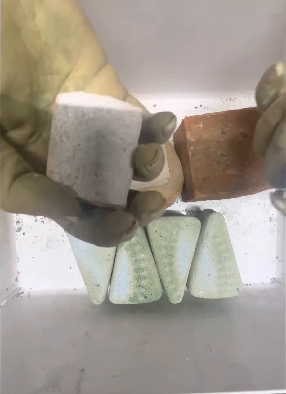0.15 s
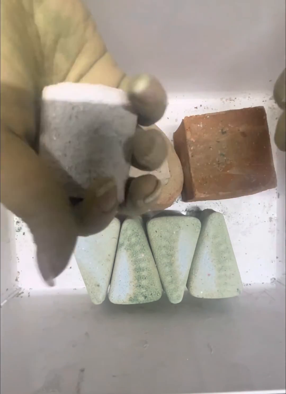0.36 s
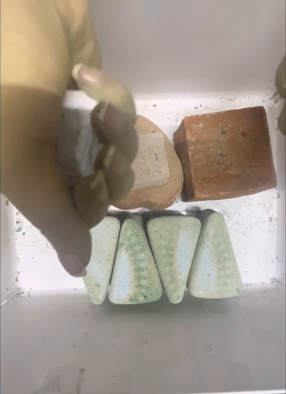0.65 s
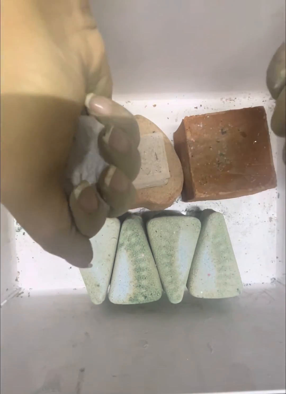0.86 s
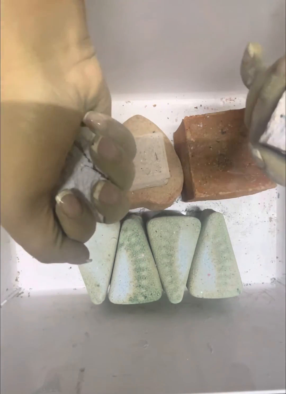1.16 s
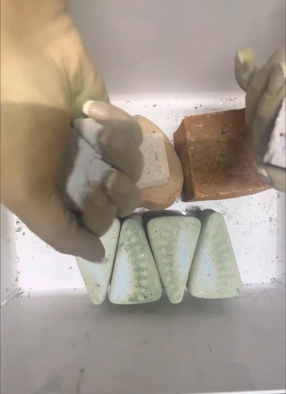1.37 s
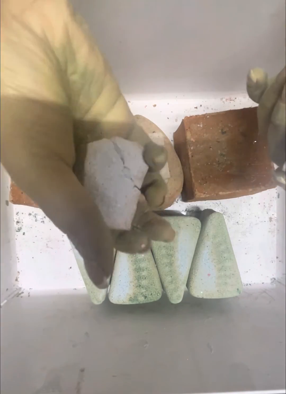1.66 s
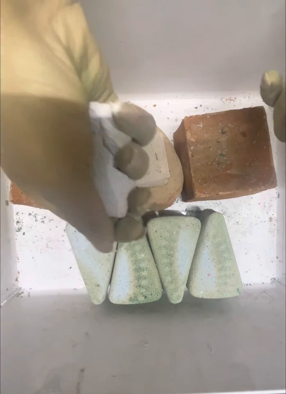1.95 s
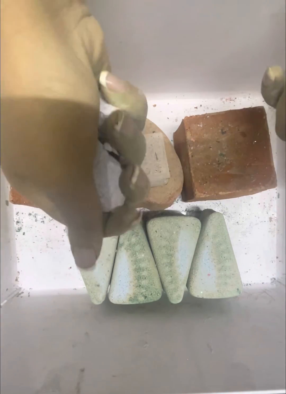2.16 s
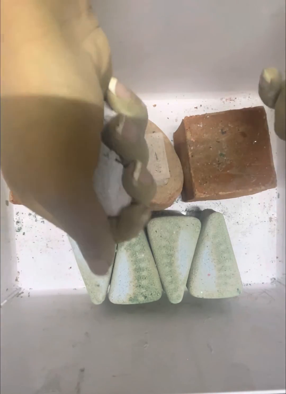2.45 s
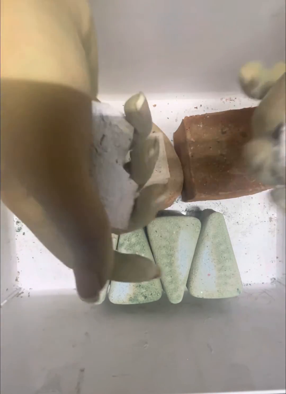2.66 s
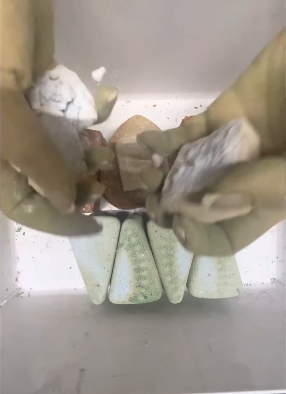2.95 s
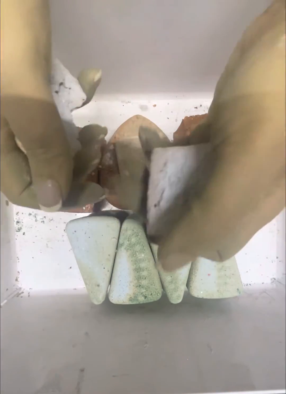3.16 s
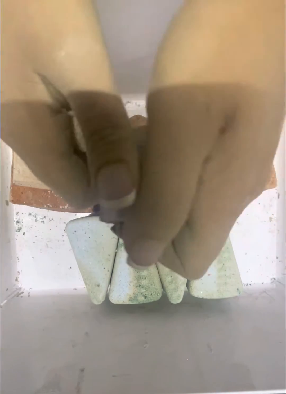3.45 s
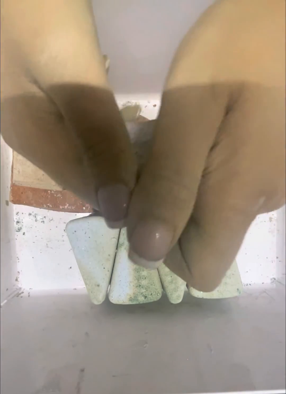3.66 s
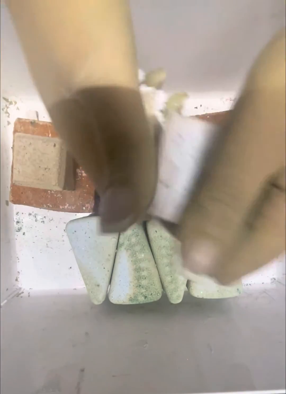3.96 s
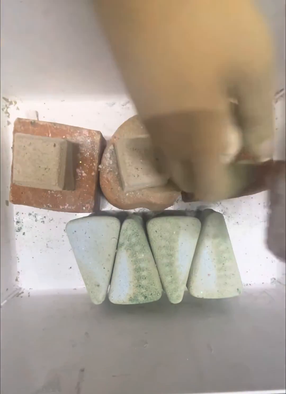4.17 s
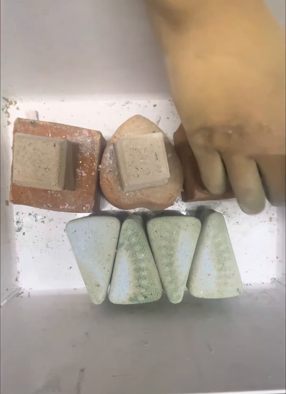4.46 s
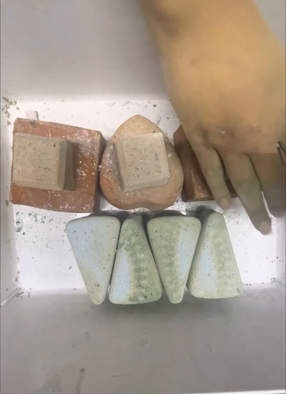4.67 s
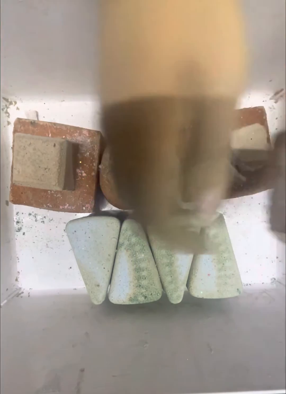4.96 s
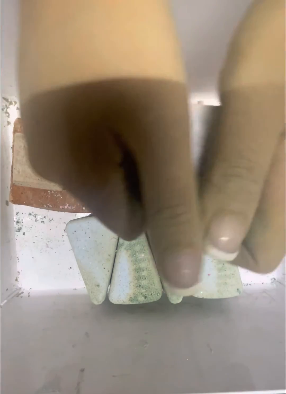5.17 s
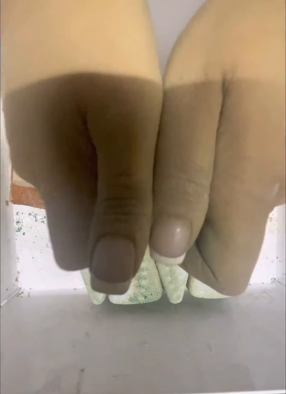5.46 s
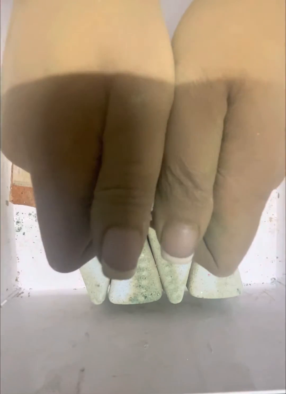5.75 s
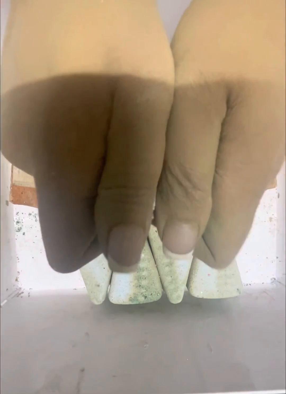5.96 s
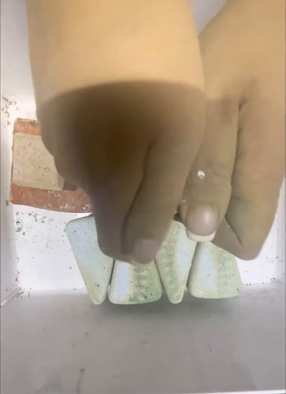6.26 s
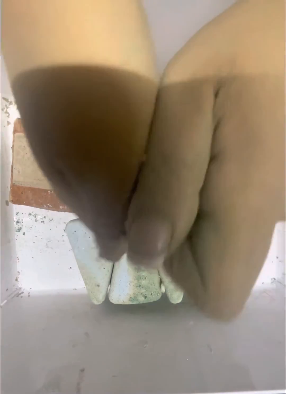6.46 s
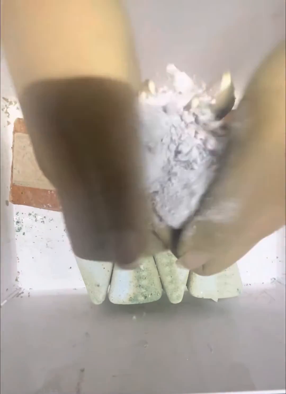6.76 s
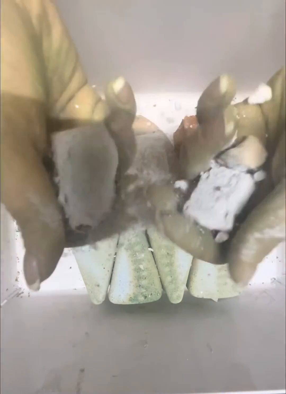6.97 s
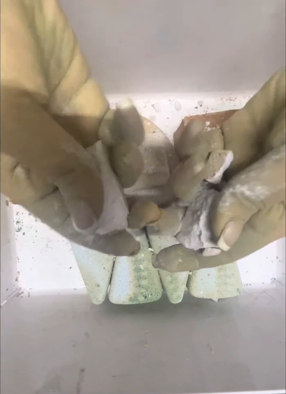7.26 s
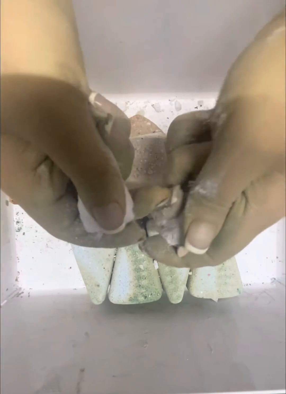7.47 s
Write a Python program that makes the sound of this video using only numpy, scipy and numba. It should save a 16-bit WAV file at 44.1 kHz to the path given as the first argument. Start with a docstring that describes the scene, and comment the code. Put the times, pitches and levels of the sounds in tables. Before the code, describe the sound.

Chalk is crushed by hand over a plastic tub, very close, in a quiet room with a short faint tail and soft low motor hum. From 0 s small dry crackles build to a sharp snap at 0.6 and another at 0.97, each with a soft bump. A near-quiet gap follows, then light ticks, and a busier crackle around 2.0-2.3 with fine grit. Faint rubbing and tiny squeaks lead to a loud crack at 3.0, chunks knocking the tub and crumbs pattering. Irregular snaps, scrapes and hollow knocks continue from 3.6 to 4.9, some shards clinking. It calms to faint dusty crackle as the low drone swells, until the loudest crack at 5.82 with a thump. From 6.0 to 7.2 grinding and dense brittle crunching, strong snaps at 6.5 and 6.84, clinks and tub knocks; then sparse grit and a last snap at 7.6.

```python
"""Chalk cracks as hands squeeze blocks of it over a plastic tub in a quiet room, close to a phone's two ports.
Each crack is a run of tiny fractures, made from bursts of noise that ring the chalk and thump the tub.
Pieces strike the tub, shards clink, and grit rubs, scrapes and squeaks, built from many small ringing grains.
Behind them lie far motors made of wavering sine tones, and room air made of coloured noise.
Both ports hear nearly the same sound, the right one lagging by a phase that mostly grows with pitch."""
import sys
import numpy as np
from scipy import signal
from scipy.fft import rfft, irfft, next_fast_len
from scipy.io import wavfile
from scipy.ndimage import uniform_filter1d
from numba import njit

SR = 44100
rng = np.random.default_rng(int(sys.argv[2]) if len(sys.argv) > 2 else 0)


def wav_record(signal):
    """Record a signal, one row per channel, as 16-bit PCM in the file named by sys.argv[1]."""
    frames = np.transpose(np.atleast_2d(signal))
    bounded = np.clip(frames, -1, 1)
    # unit amplitude maps onto the largest positive 16-bit level
    quanta = np.round(bounded * 32767).astype(np.int16)
    wavfile.write(sys.argv[1], SR, quanta)


N = 336042
T = np.arange(N) / SR  # time of every sample [s]

# Cracks through the chalk; peaks are before a small random tilt between the ports:
# (time [s], thump pitch [Hz], thump peak [dB], knock pitch [Hz], knock peak [dB],
#  edge peak [dB], dust fizz peak [dB], snap time [ms], kept within 0.7 to 12)
CRACK_EVENTS = [(0.029, 270, -63, 1020, -79, -47.5, -38, 15),
                (0.107, 230, -60.5, 4040, -66, -42.5, -35.5, 9.2),
                (0.189, 253, -44.5, 3660, -44.5, -35.5, -29, 13), (0.256, 230, -77, 4000, -88, -54, -44, 3),
                (0.28, 230, -72, 4000, -74, -50, -50, 1.6), (0.326, 231, -62, 4180, -75, -44.5, -45.5, 5.8),
                (0.419, 456, -50, 3870, -46, -36, -28.5, 0.51), (0.429, 383, -52, 4170, -40, -49, -46, 9.2),
                (0.476, 230, -52, 3880, -39, -38, -42, 1.1), (0.482, 370, -56, 1950, -41.5, -36, -37, 2.2),
                (0.525, 260, -74, 3760, -70, -46, -37.5, 2.1), (0.55, 260, -78, 3950, -67, -46, -40.5, 2),
                (0.599, 300, -85, 4200, -56, -47, -46, 2.6), (0.612, 656, -68, 3500, -29, -24, -19.5, 4.2),
                (0.616, 680, -32.5, 3470, -22.5, -12, -17, 2.6),
                (0.646, 615, -52, 3750, -62, -44, -38, 2.3),
                (0.694, 617, -53, 2800, -45.5, -47.5, -54, 3.4),
                (0.867, 261, -71, 2310, -53, -47.5, -57, 2.1),
                (0.883, 260, -75, 3520, -66, -59, -38.5, 1.7), (0.9, 260, -75, 3800, -68, -50, -41, 1.5),
                (0.924, 260, -70, 2800, -64, -48, -48, 2.3), (0.966, 378, -31, 3000, -18, -11.5, -19, 3),
                (1.06, 230, -67, 4000, -68, -68, -54, 2.3), (1.12, 230, -69, 4000, -68, -65.5, -47, 2),
                (1.256, 230, -69, 3000, -68, -52, -45.5, 3), (1.307, 230, -76, 3100, -63, -44, -64, 7.5),
                (1.382, 230, -49, 4050, -52, -41, -39, 2.2), (1.448, 232, -58, 3880, -70, -41, -46, 3),
                (1.51, 230, -103, 4000, -70, -49, -37, 2), (1.545, 230, -85, 4000, -65, -39, -40, 3),
                (1.563, 237, -79, 1700, -51, -36, -32, 2.3), (1.624, 494, -45, 2500, -33.5, -29, -24.5, 4),
                (1.714, 230, -68, 3000, -60, -55, -38, 2.4), (1.749, 230, -58, 3500, -67, -47, -37, 2.3),
                (1.76, 230, -68, 3520, -63, -40, -35, 4.5), (1.794, 230, -53, 3700, -46, -31.5, -40, 13),
                (1.818, 390, -58, 2370, -75, -63.5, -37, 3.6),
                (1.944, 230, -67, 4000, -47, -35, -48.5, 1.9), (1.988, 820, -61, 2300, -39, -36, -25, 1.9),
                (2.02, 260, -73, 3900, -40, -22, -48, 4.4), (2.034, 250, -64, 4070, -64, -60, -42, 2.1),
                (2.063, 230, -68, 2760, -42, -30, -32, 2.2), (2.13, 710, -52, 4660, -35, -24.5, -28, 2.6),
                (2.19, 230, -57, 3330, -45, -36, -40, 2.4), (2.206, 500, -56, 1810, -39, -56, -54, 1.2),
                (2.219, 228, -52, 3250, -37.5, -29, -23.5, 4.6),
                (2.246, 237, -65, 4170, -43, -34, -34, 2.3), (2.282, 230, -63, 2350, -37, -23, -23.5, 2.9),
                (2.332, 230, -79, 4150, -72, -45.5, -39, 2.8), (2.493, 230, -72, 4000, -74, -59, -29, 16),
                (2.515, 260, -59, 3850, -46, -42, -31, 7.5), (2.545, 600, -64, 2000, -59, -53, -48, 2),
                (2.569, 230, -57, 4200, -66, -44, -33, 16), (2.716, 250, -60, 3000, -70, -41.5, -34, 8.7),
                (2.794, 248, -56, 4200, -75, -34.5, -54, 6.2), (2.861, 250, -59, 3000, -73, -44, -44, 6.3),
                (2.909, 300, -51, 4220, -64, -34, -27.5, 5), (2.986, 560, -23.5, 2340, -7.5, -10, -10, 5.7),
                (3.049, 680, -33, 2400, -22, -18, -24.5, 5.4), (3.071, 695, -36, 2390, -27, -26, -32, 6.2),
                (3.078, 630, -24, 1000, -21, -52, -44, 3.3), (3.096, 484, -36, 900, -48, -52, -40, 4.5),
                (3.125, 750, -52, 3200, -27.5, -34, -49, 5.4), (3.132, 726, -37, 2620, -22, -37, -38, 1.6),
                (3.157, 596, -40, 1350, -31, -32, -35, 9.9), (3.179, 594, -42, 1850, -31.5, -44, -42, 3.4),
                (3.222, 490, -63, 2500, -55, -78, -48, 3), (3.274, 490, -53, 2500, -42.5, -42, -53, 3.2),
                (3.33, 490, -45, 2270, -44, -40, -34.5, 4.5), (3.34, 298, -49, 2670, -51, -41.5, -36, 10),
                (3.605, 253, -72, 4160, -69, -43, -38.5, 7.2),
                (3.635, 725, -47.5, 2420, -36.5, -38, -35, 5.2),
                (3.657, 230, -60, 3130, -66, -35, -28.5, 7.8),
                (3.691, 230, -67, 4070, -65, -38, -32.5, 5.7),
                (3.7, 473, -45, 3720, -39.5, -34.5, -32.5, 3.2),
                (3.735, 504, -53, 1770, -40, -39, -38, 8.8),
                (3.761, 487, -38, 2460, -27, -24.5, -24.5, 4.6),
                (3.836, 500, -47, 2000, -56, -51, -41, 5.3), (3.911, 476, -38, 2280, -33, -29, -43, 6),
                (3.955, 400, -72, 3220, -48, -45, -44, 7.3), (3.982, 500, -50.5, 2000, -49, -56, -47, 2),
                (4.032, 370, -57, 3900, -58, -30.5, -22.5, 17), (4.047, 230, -50, 1950, -44, -41, -25, 5.8),
                (4.12, 507, -38, 3250, -40, -30, -32, 1.56), (4.262, 576, -43, 3500, -44, -36, -31.5, 8.9),
                (4.274, 482, -34, 1030, -39, -33.5, -33, 6.7), (4.293, 460, -47, 900, -56, -34.5, -35, 6.3),
                (4.317, 677, -27, 1170, -22.5, -52, -47, 4.4),
                (4.345, 617, -33.5, 1100, -33, -37, -46, 2.4), (4.386, 500, -54, 2500, -43, -50, -52, 2.3),
                (4.443, 700, -26, 2500, -18, -18.5, -39, 3.4),
                (4.458, 470, -62, 2400, -30, -25.5, -27, 5.8), (4.492, 460, -52, 890, -43, -50, -33.5, 1.4),
                (4.509, 505, -48, 1860, -40, -46, -52, 4), (4.582, 294, -42, 2890, -54, -45, -38, 6.3),
                (4.597, 405, -43.5, 1990, -63, -51, -49, 4), (4.641, 230, -48, 3390, -72, -38, -24, 9.7),
                (4.683, 320, -24.5, 1080, -36.5, -48, -21, 5.7),
                (4.744, 490, -29.5, 4110, -66, -33.5, -34, 1.5),
                (4.758, 347, -35.5, 1140, -57, -54, -41, 8.1),
                (4.82, 630, -37.5, 2250, -30, -28.5, -30, 0.8),
                (4.834, 480, -37.5, 2970, -56, -57, -37, 3.4), (4.858, 503, -47, 2000, -45, -51, -43, 2.5),
                (4.955, 234, -62, 930, -57, -60, -38, 7.2), (5.047, 225, -71, 4190, -69.5, -58.5, -42, 5.7),
                (5.124, 230, -70, 2500, -62, -49.5, -44.5, 8.2), (5.204, 232, -61, 970, -66, -52, -41, 15),
                (5.223, 400, -59, 2000, -53.5, -52, -47, 2), (5.261, 298, -49, 3380, -46, -43, -33.5, 10),
                (5.327, 229, -57.5, 3140, -50.5, -43, -30, 14), (5.335, 251, -49, 3290, -52, -42, -31, 14),
                (5.419, 230, -63.5, 2140, -67.5, -51, -36, 8), (5.487, 233, -74, 2220, -54, -48.5, -45, 2),
                (5.527, 230, -74, 2200, -55, -50, -41.5, 2),
                (5.664, 313, -40.5, 4400, -29.5, -25.5, -21.5, 6.9),
                (5.72, 230, -65, 2170, -53, -41, -37.5, 2.2), (5.785, 300, -62, 2200, -51, -50, -46, 2.3),
                (5.794, 430, -61, 2270, -35.5, -30, -30.5, 6), (5.806, 500, -63, 2320, -38, -46, -53, 1.6),
                (5.817, 693, -15.5, 2200, -5.5, -5, -16, 3.34), (5.825, 620, -45, 2470, -15, -17, -15.5, 2),
                (5.843, 790, -49, 2640, -20, -19.5, -17.5, 10), (6.01, 230, -57, 3670, -60, -53, -30, 3.3),
                (6.047, 790, -58, 3920, -39, -43, -33, 1.2), (6.093, 507, -48, 3500, -44, -38, -43, 3),
                (6.107, 394, -45.5, 2280, -35, -27.5, -27, 8), (6.131, 576, -48, 3000, -36, -44, -62, 4.5),
                (6.145, 244, -43.5, 2140, -33, -28, -27, 11), (6.16, 585, -42, 2320, -31.5, -31, -29, 4.2),
                (6.18, 378, -43, 1890, -37, -26.5, -29.5, 6),
                (6.258, 575, -31.5, 1940, -21, -14, -19.5, 4.5),
                (6.271, 238, -40, 2240, -25.5, -27, -31, 15), (6.29, 740, -59, 3400, -51, -25.5, -26, 7.1),
                (6.339, 590, -36.5, 1420, -22.5, -28.5, -29.5, 7.3),
                (6.391, 755, -57, 4180, -49, -37, -30.5, 6.1),
                (6.431, 366, -28.5, 3330, -33.5, -45, -22, 3.7),
                (6.465, 604, -29.5, 2100, -29, -33, -25.5, 4.3),
                (6.502, 705, -25, 3380, -11.5, -10, -20.5, 2.06),
                (6.51, 800, -26, 1450, -21, -41, -45, 4.7), (6.52, 487, -26.5, 1910, -29, -42, -43, 2.4),
                (6.537, 415, -29, 1580, -23, -20, -31, 3.4),
                (6.598, 530, -32.5, 1380, -23.5, -31, -36.5, 8.1),
                (6.656, 416, -21.5, 1020, -14, -26, -27, 3.6), (6.665, 594, -27, 1000, -26, -26, -20, 3.2),
                (6.7, 430, -64, 940, -49, -54, -33, 3.9), (6.789, 298, -66, 1270, -56, -38, -24.5, 5.8),
                (6.802, 556, -37.5, 4160, -43, -26, -25, 10),
                (6.84, 700, -24.5, 2800, -11.5, -7.5, -17.5, 4.1),
                (6.846, 540, -25, 1770, -24, -39, -32, 2.3), (6.898, 564, -26, 2190, -21, -27.5, -31, 3.7),
                (6.919, 530, -30, 1200, -28.5, -29, -35, 14), (6.934, 530, -34, 1240, -31, -27.5, -31, 5.7),
                (6.968, 506, -38, 2800, -30.5, -27, -27, 3.6), (6.979, 595, -36, 3680, -36, -40, -27, 9.7),
                (6.989, 410, -33, 950, -33, -32, -31, 18), (7.069, 605, -55, 3430, -59, -35, -32, 7.6),
                (7.094, 450, -79, 900, -71, -41, -29.5, 6.5), (7.147, 640, -32, 1740, -24, -31.5, -40, 5.2),
                (7.165, 474, -36, 1000, -45, -34, -30, 5.6),
                (7.204, 640, -39.5, 1090, -36.5, -62, -52, 6.5),
                (7.386, 288, -69, 2210, -58, -34, -27.5, 4.8),
                (7.495, 294, -54, 1260, -44.5, -42, -38, 3.3), (7.551, 394, -113, 4130, -81, -38.5, -30, 3),
                (7.607, 372, -31, 2910, -25.5, -20.5, -18, 4.8)]
# Where a block rings, for its dull chunk, its sharp edge and its fizzing dust:
# (pitch [Hz], width [Hz], relative level [dB])
CHUNK_TONES = [(1060, 550, -6), (1788, 163, -1.5), (2276, 240, -6), (3557, 300, -12)]
EDGE_TONES = [(4647, 3570, 7), (5030, 3110, 9), (8620, 3380, -8.5)]
DUST_TONES = [(8510, 1300, -6), (10635, 348, 4.5), (11940, 3000, -10)]
PAN_SPREAD_DB = 0.7  # typical random level difference between the ports


def cracks(crumble_db=-26, crumble_s=0.016, apart=0.3):
    """Each crack is a run of tiny fractures, a few ms long, that shoves the tub and rings chunk, edge and dust."""
    out = np.zeros((2, N + 3072))
    t = np.arange(3072) / SR
    for s, tub_hz, tub_db, knock_hz, knock_db, edge_db, dust_db, ms in CRACK_EVENTS:
        fractures = rng.standard_normal((3, len(t))) * undb(2.0 * rng.exponential(size=len(t)))
        # one part is shared, another differs between the ports
        noise = fractures[0] + apart * fractures[1:]
        pan_db = PAN_SPREAD_DB * rng.standard_normal()
        length = np.clip(ms, 0.7, 12) / 1000

        # the fracture spreads, then stops; a weaker crumble follows as the faces part
        spread = np.minimum(t / (0.00074 + 0.2 * length), 1) ** 2
        snap = noise * spread * np.exp(-1.6 * t / length)
        crumble = noise * undb(crumble_db) * np.exp(-t / crumble_s) * np.minimum(t / length, 1)
        run = snap + crumble

        # the block gives way with one jolt once the fracture has spread
        jolt = signal.unit_impulse(len(t), int((0.001 + 0.2 * length) * SR))
        push = jolt + 0.77 * snap[0] / np.sqrt(np.sum(snap[0] ** 2))
        shove = band(band(push, tub_hz, 0.47 * tub_hz), tub_hz, 0.47 * tub_hz)

        thump = peak(0.25 * tub(shove) + 3.8 * shove, tub_db)
        knock = peak(band(run, knock_hz, 0.075 * knock_hz) + 0.18 * body(run, CHUNK_TONES), knock_db)
        edge = peak(body(run, EDGE_TONES), edge_db)
        fizz = peak(body(snap, DUST_TONES), dust_db)
        tilt = undb([[pan_db / 2], [-pan_db / 2]])
        i = int(s * SR)
        out[:, i:i + len(t)] += tilt * (thump + knock + edge + fizz)
    return out[:, :N]


# Ringing modes of the plastic tub: (pitch [Hz], relative level [dB], time to fade by 60 dB [s])
TUB_MODES = [(192, -6.5, 0.043), (339.8, 3.5, 0.27), (385.4, 4.5, 0.28), (445, 0.5, 0.089),
             (489.2, 10.5, 0.13), (518, -5, 0.027), (611, 0, 0.13), (658, 5.5, 0.032), (736, 1, 0.055),
             (913, 0.5, 0.05), (1024, 0.5, 0.05)]
# How unevenly each mode reaches the two ports; past 1 either way it arrives inverted at one:
# (one number per mode [no unit])
TUB_LEANS = [0.23, -0.12, -0.2, 0.3, 0.081, -2.8, -0.48, 1, -3.09, -0.75, -1.9]


def tub(push, reach=lambda hz: 1):
    """The thin tub rings in modes that lean to one port; reach(Hz) says how well the push excites each."""
    widths = [ring_width(t60) for _, _, t60 in TUB_MODES]
    power = sum(undb(2 * db) * np.pi * w / SR for (_, db, _), w in zip(TUB_MODES, widths))
    out = 0
    for (hz, db, _), width, side in zip(TUB_MODES, widths, TUB_LEANS):
        mode = reach(hz) * undb(db) * band(push, hz, width)
        out = out + mode * np.array([[1 + side], [1 - side]])
    return out / np.sqrt(power)


# Pieces striking the tub: (time [s], peak [dB], pitch around which the tub rings most [Hz])
DROP_EVENTS = [(2.987, -11, 460), (2.995, -24.5, 527), (3.053, -29, 505), (3.095, -32.5, 485),
               (3.912, -37, 490), (4.121, -59, 490), (4.319, -36, 614), (4.445, -34, 594),
               (4.685, -29, 346), (4.686, -31, 654), (4.745, -31, 496), (4.752, -38, 450),
               (4.766, -43, 392), (6.433, -41, 380), (6.466, -31, 620), (6.657, -21.5, 443),
               (6.843, -23.5, 507), (6.901, -39, 520), (6.991, -26, 382), (7.152, -35, 520),
               (7.262, -36, 490), (6.508, -29, 430)]
DROP_SPREAD_OCT = 0.33  # how far from that pitch modes still ring [octaves]


def drops():
    """One clean blow rings the modes of the tub, those near its pitch the most."""
    out = np.zeros((2, N + 8192))
    blow = np.pad(np.hanning(40), (0, 8192 - 40))
    for s, peak_db, centre_hz in DROP_EVENTS:
        rung = tub(blow, lambda hz: nearness(hz, centre_hz, DROP_SPREAD_OCT))
        i = int(s * SR)
        out[:, i:i + len(blow)] += peak(rung, peak_db)
    return out[:, :N]


# Ringing modes of a hard shard: (pitch [Hz], relative level [dB], time to fade by 60 dB [s])
SHARD_MODES = [(2070, 11, 0.036), (3420, 3, 0.053), (4470, 3, 0.054), (5200, 5, 0.015), (6000, 2.5, 0.073),
               (7300, 10, 0.019)]
# Shards clinking together: (time [s], peak [dB], pitch around which the shard rings most [Hz])
CLINK_EVENTS = [(0.328, -70, 4260), (1.29, -57, 6800), (2.909, -48.5, 6800), (4.645, -36, 5600),
                (4.668, -45, 4440), (4.685, -32.5, 4650), (4.742, -40, 5300), (4.765, -48.5, 6160),
                (6.457, -30, 6970), (6.467, -24, 3560), (6.788, -33, 6100), (6.803, -22, 3800),
                (6.819, -32, 2940), (6.944, -36, 3400), (6.975, -38, 3500), (7.053, -42, 2870)]
CLINK_SPREAD_OCT = 0.4  # how far from that pitch modes still ring [octaves]
CLINK_S = 0.0015  # how fast the contact dies away [s]


def clinks():
    """A short rough contact rings the modes of a shard, those near its pitch the most."""
    out = np.zeros(N + 4096)
    t = np.arange(4096) / SR
    for s, peak_db, centre_hz in CLINK_EVENTS:
        touch = rng.standard_normal(len(t)) * np.exp(-t / CLINK_S)
        rung = sum(undb(db) * nearness(hz, centre_hz, CLINK_SPREAD_OCT) * band(touch, hz, ring_width(t60))
                   for hz, db, t60 in SHARD_MODES)
        i = int(s * SR)
        out[i:i + len(t)] += peak(rung, peak_db)
    return out[:N]


# Grit rubbing between the palms, before its surges:
# (time [s], grit level [dB], powder level [dB], level of crumbs on the tub [dB])
GRIT_LEVELS = [(0.0, -70, -64.5, -73), (0.38, -74, -69, -77.5), (0.8, -85, -69, -76),
               (1.0, -64, -84.5, -88), (1.2, -85, -76.5, -86), (1.3, -69, -65, -82),
               (1.55, -64, -56, -72.5), (2.14, -52.5, -58, -66), (2.33, -77, -85, -93),
               (2.43, -77, -69, -82), (2.6, -64.5, -55.5, -76), (2.84, -65, -52, -73),
               (2.97, -57, -47, -60), (3.14, -51.5, -55, -47.5), (3.4, -68.5, -60, -83),
               (3.65, -71, -57, -64), (3.84, -63, -60, -60), (4.16, -64, -57.5, -71),
               (4.691, -76, -74, -72), (4.97, -82.5, -76, -65.5), (5.03, -91.5, -93.5, -74),
               (5.19, -79, -79, -71), (5.45, -77.5, -65, -83.5), (5.64, -76.5, -68, -72.5),
               (5.94, -72.5, -73, -77), (6.02, -48, -49.5, -62), (6.35, -55.5, -50, -60),
               (6.66, -59.5, -57, -59), (7.04, -53, -42, -52), (7.32, -65.5, -60, -64),
               (7.62, -65, -62.5, -75)]
# Share of coarse crumbs in the grit, larger once a block has split: (time [s], level [dB])
COARSE_SHARE = [(0, -12.5), (2.9, -13.5), (3.0, -9), (5.0, -9.5), (5.9, -9), (6.4, -6.5), (7.62, -6)]
COARSE_SHARP, FINE_SHARP = 6, 7.5  # pitch over width of a grain
# What a crack sheds: level against its edge, dust and thump peaks [dB], time to fade by 60 dB [s]
GRIT_TRAIL_DB, GRIT_TRAIL_T60_S = -35, 0.053
POWDER_TRAIL_DB, POWDER_TRAIL_T60_S = -42.5, 0.09
CRUMB_TRAIL_DB, CRUMB_TRAIL_T60_S = -20.5, 0.23
# Small ticks: how many per second, gain over grit and over powder [dB], how fast one dies away [s]
TICKS_PER_S, TICK_DB, TICK_DUST_DB, TICK_S = 50, 3, 0, 0.0013


def grit():
    """Coarse crumbs, fine grit and powder rub between the palms in uneven surges; crumbs patter on the tub."""
    s, *columns = np.transpose(GRIT_LEVELS)
    rub, dust, patter = (undb(np.interp(T, s, c)) for c in columns)
    _, _, tub_db, _, _, edge_db, dust_db, _ = np.transpose(CRACK_EVENTS)
    _, _, scrape_grit_db, scrape_powder_db = np.transpose(SCRAPE_EVENTS)
    surge = undb(2.3 * walk(40))

    coarse = undb(follow(COARSE_SHARE)) * grains(800, 848, 3340, COARSE_SHARP, hiss=0.5)
    # grit breaks all over the hands, so part of it differs between the ports
    shared = grains(900, 2770, 10040, FINE_SHARP, hiss=0.26)
    differing = grains(1100, 5000, 5300, FINE_SHARP, hiss=0.41)
    fine = undb(-6) * (shared + 0.5 * np.array([[1], [-1]]) * differing)
    powder_grains = grains(750, 9660, 6800, 5.7, hiss=0.3)
    powder = undb(2 * walk(40)) * unit(body(powder_grains, DUST_TONES))
    crumbs = unit(tub(grains(250, 220, 680, 1.3, hiss=0.31)))

    shed = rub + strokes(scrape_grit_db) + trail(edge_db + GRIT_TRAIL_DB, GRIT_TRAIL_T60_S)
    puffed = dust + strokes(scrape_powder_db) + trail(dust_db + POWDER_TRAIL_DB, POWDER_TRAIL_T60_S)
    dropped = patter + trail(tub_db + CRUMB_TRAIL_DB, CRUMB_TRAIL_T60_S)

    # now and then a grain snaps
    start = (rng.random(N) < TICKS_PER_S / SR) * undb(2.3 * rng.standard_normal(N))
    tick = fade(start, TICK_S) * rng.standard_normal(N)
    hard_ticks = undb(TICK_DB) * shed * (body(tick, EDGE_TONES) + 0.17 * body(tick, CHUNK_TONES))
    dust_ticks = undb(TICK_DUST_DB) * dust * body(tick, DUST_TONES)
    rubbing = shed * unit(coarse + fine) + puffed * powder + dropped * crumbs
    return surge * rubbing + hard_ticks + dust_ticks


# Fingers scraping over the chalk in short strokes:
# (start time [s], length [s], grit level [dB], powder level [dB])
SCRAPE_EVENTS = [(0.406, 0.11, -49.5, -48.5), (0.853, 0.053, -72, -62), (0.997, 0.18, -69, -93),
                 (1.228, 0.23, -82, -73), (1.367, 0.11, -56.5, -57.5), (1.551, 0.069, -58, -53),
                 (1.627, 0.023, -44, -68), (1.752, 0.1, -53, -50), (2.475, 0.13, -62.5, -50),
                 (3.122, 0.11, -48.5, -46), (3.316, 0.05, -54, -39.5), (3.397, 0.12, -60, -48),
                 (3.64, 0.19, -62, -93), (3.856, 0.052, -104, -48), (4.118, 0.052, -64, -58),
                 (4.258, 0.085, -60, -49), (4.83, 0.17, -68.5, -70), (4.92, 0.042, -68, -55),
                 (5.057, 0.14, -71, -58), (5.202, 0.033, -75, -50.5), (5.278, 0.12, -55, -44),
                 (5.693, 0.11, -59, -53.5), (5.818, 0.088, -39, -43), (6.265, 0.037, -37.5, -32),
                 (6.407, 0.31, -45, -50), (7.163, 0.18, -57, -78), (7.37, 0.14, -62, -79)]
SCRAPE_RISE = 0.28  # share of a stroke spent swelling


def strokes(level_db):
    """Loudness of the scrapes: each swells quickly and fades over the rest of its length."""
    out = 0
    for (s, length, *_), db in zip(SCRAPE_EVENTS, level_db):
        corners = s + length * np.array([0, SCRAPE_RISE, 1])
        out = out + undb(db) * np.interp(T, corners, [0, 1, 0])
    return out


def trail(peak_db, t60):
    """Loudness of the shower that every crack leaves, dying away."""
    start = np.zeros(N)
    start[(np.transpose(CRACK_EVENTS)[0] * SR).astype(int)] = undb(peak_db)
    return fade(start, t60 / np.log(1000))


# Grit grinding inside the clasped hands: (time [s], level [dB])
HOLLOW_LEVEL = [(5.35, -93), (5.45, -74), (5.65, -83), (5.9, -65), (5.96, -63), (6.02, -58), (6.22, -52.5),
                (6.3, -80)]
HOLLOW_HZ, HOLLOW_WIDTH_HZ = 2200, 550


def hollow():
    """Dense grains ring the hollow of the clasped hands, one resonance."""
    grind = band(grains(300, 1800, 3200, COARSE_SHARP, hiss=0.3), HOLLOW_HZ, HOLLOW_WIDTH_HZ)
    return undb(follow(HOLLOW_LEVEL)) * unit(grind)


# Grit squeaking briefly on skin: (time [s], peak [dB], pitch [Hz], length before a 1.8-fold stretch [s])
SQUEAK_EVENTS = [(2.479, -45, 7200, 0.045), (2.553, -49, 5940, 0.055), (2.617, -50, 6060, 0.12),
                 (3.16, -44, 6270, 0.018), (3.84, -48, 7400, 0.034), (2.8, -44.5, 7240, 0.015),
                 (2.856, -53, 5930, 0.03), (2.954, -41.5, 6130, 0.014), (3.092, -29.5, 7320, 0.011),
                 (4.947, -53, 6030, 0.019), (7.066, -41, 7400, 0.039)]


def squeaks():
    """Short rough whistles, narrow noise that swells and fades, stuttering as the grit catches."""
    out = np.zeros(N)
    stutter = undb(3 * walk(60))
    for s, peak_db, hz, length in SQUEAK_EVENTS:
        i, n = int(s * SR), int(1.8 * length * SR)
        rough = stutter[i:i + n] * rng.standard_normal(n)
        whistle = band(band(rough, hz, 300), hz, 300)
        out[i:i + n] += peak(np.hanning(n) * whistle, peak_db)
    return out


# Hands and blocks bumping the table: (time [s], peak [dB], pitch [Hz])
BUMP_EVENTS = [(0.617, -33.5, 169), (0.968, -31, 192), (4.682, -36.5, 190), (4.747, -33, 202),
               (4.759, -34, 151), (4.789, -37.5, 70), (5.819, -22.5, 310), (5.822, -31.5, 170),
               (5.827, -35, 116), (5.857, -36.5, 72.6), (6.258, -42, 128), (6.435, -35.5, 190)]


def bumps():
    """Soft single blows ring the table top low and short."""
    out = np.zeros(N)
    blow = signal.unit_impulse(4096)
    for s, peak_db, hz in BUMP_EVENTS:
        i = int(s * SR)
        thud = band(band(blow, hz, 0.61 * hz), hz, 0.61 * hz)
        out[i:i + len(blow)] += peak(thud, peak_db)
    return out


ROOM_T60_S, ROOM_DB = 0.26, -18  # time for the lower pitches to fade by 60 dB, gain of the tail


def room(x):
    """A short diffuse tail, other in each port, duller as it fades."""
    t = np.arange(SR // 2) / SR
    noise = rng.standard_normal((2, len(t))) * (t > 0.004)
    dull = signal.sosfilt(signal.butter(1, 4000, fs=SR, output="sos"), noise)
    bright = noise - dull
    # the bright part fades twice as fast
    tail = dull * undb(-60 * t / ROOM_T60_S) + bright * undb(-60 * t / (0.5 * ROOM_T60_S))
    tail = tail / np.sqrt(np.sum(tail ** 2) / 2)
    return undb(ROOM_DB) * signal.fftconvolve(x, tail, axes=1)[:, :N]


# Steady tones of a far motor: (pitch before a slight waver [Hz], peak before a slow sway [dB])
HUM_TONES = [(59, -53.5), (119, -59), (180, -68.5), (238, -68.5), (297, -73.5)]
# A second far motor that comes and goes: (time [s], peak [dB])
DRONE_LEVEL = [(0, -68), (2.5, -68), (3.1, -53), (3.5, -50), (3.8, -66), (4.6, -64), (4.9, -51),
               (5.75, -49), (5.95, -68), (7.0, -66), (7.62, -58)]
# Low rumble in the air, below about 300 Hz: (time [s], level [dB])
RUMBLE_LEVEL = [(0, -57.5), (2, -56.5), (4.3, -58.5), (4.8, -48.5), (5.3, -58.5), (6.2, -52), (7.62, -54)]
# Tone colour of the room air: (pitch [Hz], relative level per Hz [dB])
AIR_COLOUR = [(30, -35), (45, -2.5), (75, -4.5), (140, -6.5), (220, -10.5), (350, -19.5), (600, -38.5),
              (1500, -82.5), (3500, -32.5), (7000, -56.5), (10500, -56), (12000, -100)]


def background(apart=0.25):
    """A motor's wavering tones, a drone, and room air, nearly alike at both ports."""
    turn = 2 * np.pi * (T + np.cumsum(0.00519 * walk(3.6)) / SR)  # the pitch wavers
    sway = undb(2 * walk(5))
    hum = sway * sum(undb(db) * np.sin(hz * turn) for hz, db in HUM_TONES)
    drone = undb(follow(DRONE_LEVEL)) * np.sin(87.5 * turn)
    mid, side = (unit(colour(rng.standard_normal(N), AIR_COLOUR)) for _ in range(2))
    air = mid + apart * side * np.array([[1], [-1]])
    bass = signal.sosfilt(signal.butter(2, 300, fs=SR, output="sos"), air)
    return hum + drone + undb(follow(RUMBLE_LEVEL)) * bass + undb(-61.5) * (air - bass)


def undb(db):
    """dB to gain."""
    return 10 ** (np.asarray(db) / 20)


def unit(x):
    """Scale to an average (rms) level of 1."""
    return x / np.sqrt(np.mean(x ** 2))


def peak(x, db):
    """Scale so that the highest swing is db."""
    return x * undb(db) / np.max(np.abs(x))


def follow(points):
    """Straight lines through (time [s], level [dB]) points."""
    return np.interp(T, *np.transpose(points))


def fade(start, seconds):
    """Every start dies away, to about a third in the given time."""
    return signal.lfilter([1], [1, -np.exp(-1 / (seconds * SR))], start)


def ring_width(t60):
    """Width [Hz] of a resonance that fades by 60 dB in t60 seconds."""
    return np.log(1000) / np.pi / t60


def nearness(hz, centre_hz, spread_oct):
    """1 at the centre pitch, falling off smoothly on both sides."""
    return np.exp(-(np.log2(hz / centre_hz) / spread_oct) ** 2)


def band(x, hz, width):
    """Resonance of gain 1 at its centre."""
    g = np.tan(np.pi * width / SR)
    return signal.lfilter([g, 0, -g], [1 + g, -2 * np.cos(2 * np.pi * hz / SR), 1 - g], x)


def body(x, tones):
    """Broad resonances of alternating sign, scaled so that white noise roughly keeps its level."""
    power = sum(undb(2 * db) * np.pi * width / SR for _, width, db in tones)
    rung = sum((-1) ** k * undb(db) * band(x, hz, width) for k, (hz, width, db) in enumerate(tones))
    return rung / np.sqrt(power)


def colour(x, points, lag=((0, 0), (1, 0))):
    """Shape the spectrum by (Hz, dB) points, with a phase lag of (Hz, radians) points."""
    size = next_fast_len(N)
    hz, db = np.transpose(points)
    f = np.arange(size // 2 + 1) * SR / size
    gain = undb(np.interp(np.log(f + 1), np.log(hz), db))
    turn = np.exp(-1j * np.interp(f, *np.transpose(lag)))
    return irfft(rfft(x, size) * gain * turn, size)[:N]


def walk(rate):
    """Random levels held 1 / rate s and smoothed twice."""
    k = int(SR / rate)
    held = np.repeat(rng.standard_normal(N // k + 1), k)
    return 1.213 * uniform_filter1d(uniform_filter1d(held, k), k)[:N]


@njit
def ring(x, hz, width):
    """State-variable resonance whose centre and width may jump at any sample."""
    y, b, l = np.empty(len(x)), 0., 0.
    for i in range(len(x)):
        g, k = np.tan(np.pi * hz[i] / SR), width[i] / hz[i]
        v = (b + g * (x[i] - l)) / (1 + g * (g + k))
        b, l, y[i] = 2 * v - b, l + 2 * g * v, k * v
    return y


def grains(per_s, lo_hz, hi_hz, sharp, hiss, scatter_db=3.8, grain_s=0.0022):
    """Grains of uneven size over a hiss; each rings at a pitch of its own until the next one breaks."""
    start = rng.random(N) < per_s / SR
    size = start * undb(scatter_db * np.minimum(rng.exponential(size=N), 3))
    swell = unit(fade(size, grain_s)) + hiss
    pitches = lo_hz * (hi_hz / lo_hz) ** rng.random(N // 16)
    hz = pitches[np.cumsum(start)]
    return unit(ring(swell * rng.standard_normal(N), hz, hz / sharp))


def scene():
    """Chalk in the hands, its room tail and the background."""
    chalk = cracks() + drops() + clinks() + grit() + hollow() + squeaks() + bumps()
    direct = chalk * undb([[-0.5], [0.5]])  # a little louder on the right
    return direct + room(chalk.mean(axis=0, keepdims=True)) + background()


# Tone colour of both ports: (pitch [Hz], gain [dB])
PORT_COLOUR = [(100, -1), (4000, -2), (8000, 0.5), (10500, 4.5), (12000, -1), (13500, -16.5), (16000, -12)]
# How far the right port lags: (pitch [Hz], phase lag [radians])
RIGHT_LAG = [(0, 0), (520, -0.4), (2670, 0.5), (3960, 0.5), (4310, 1.1), (5510, 6.3), (6370, 6.6),
             (8180, 9.4), (9040, 8.9), (9910, 9.5), (11800, 12.3), (13800, 12.7), (14800, 15.5),
             (16000, 15.6)]
TOP_HZ = 16400  # nearly nothing is left above this pitch


def record(dry):
    """Port resonance, lag between the ports, and a steep cut of the highest pitches."""
    ports = np.array([colour(dry[0], PORT_COLOUR), colour(dry[1], PORT_COLOUR, RIGHT_LAG)])
    return signal.sosfilt(signal.ellip(10, 0.2, 95, TOP_HZ, fs=SR, output="sos"), ports)


dry = scene()
out = record(dry)
wav_record(out)
```